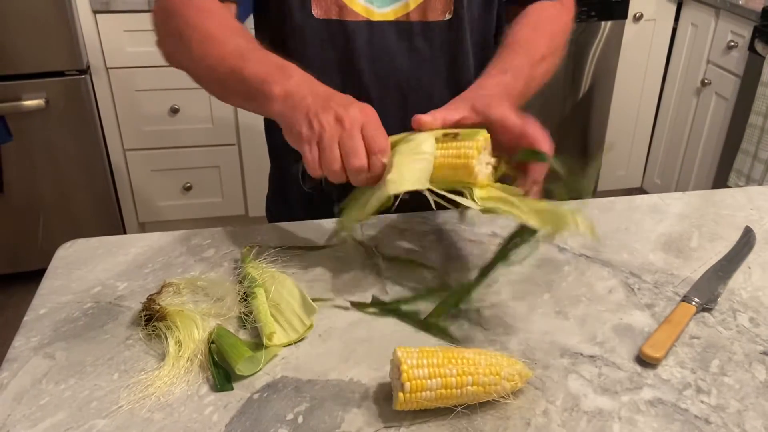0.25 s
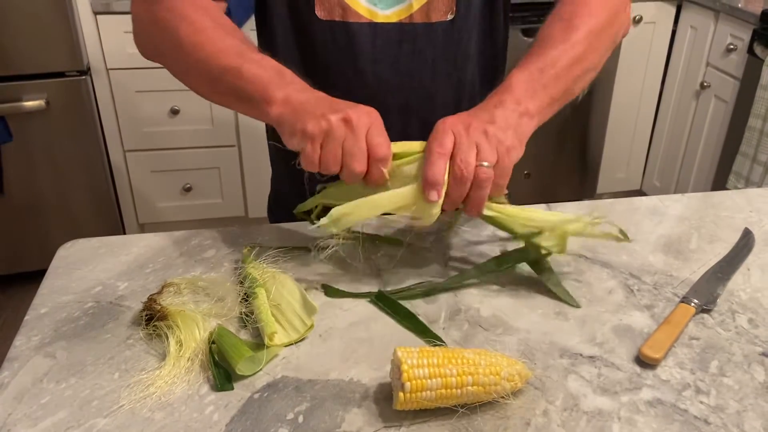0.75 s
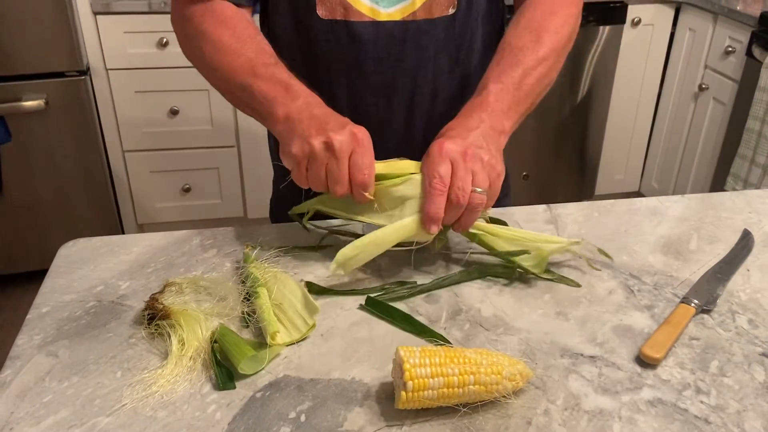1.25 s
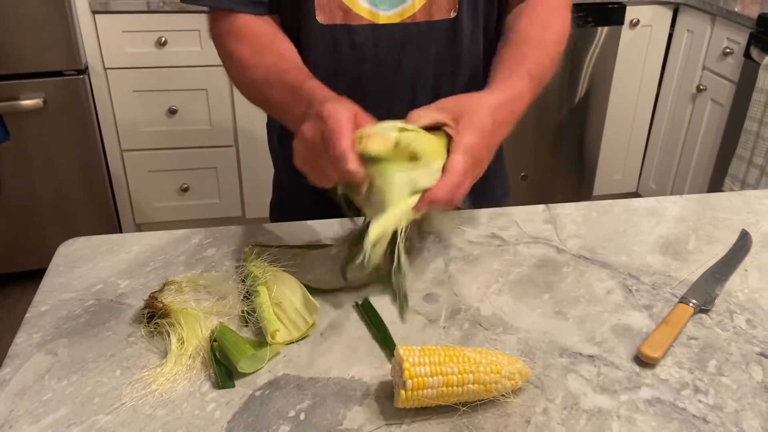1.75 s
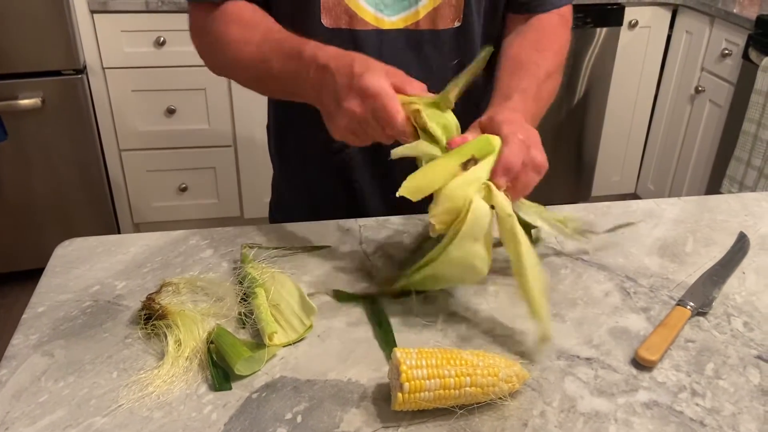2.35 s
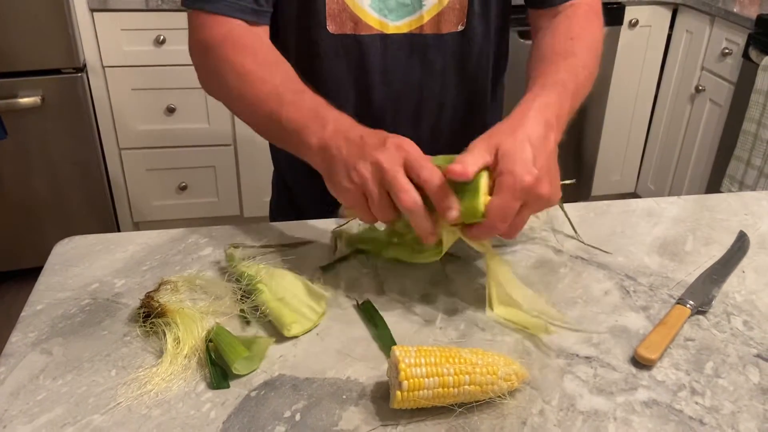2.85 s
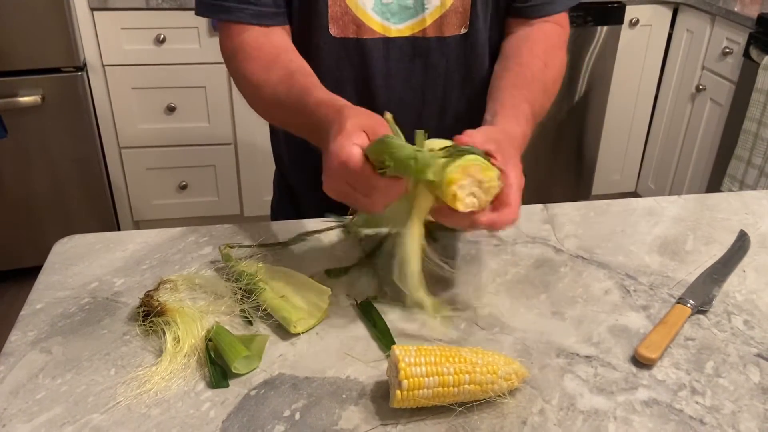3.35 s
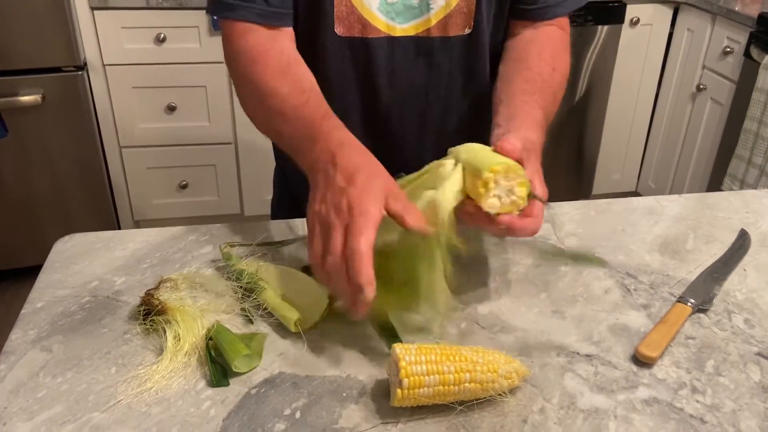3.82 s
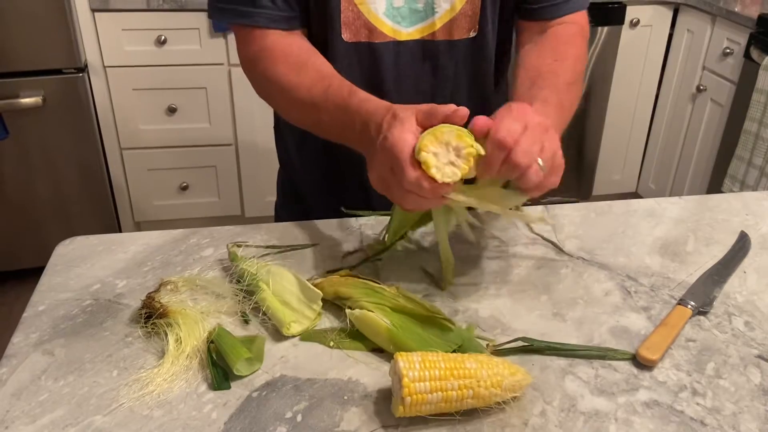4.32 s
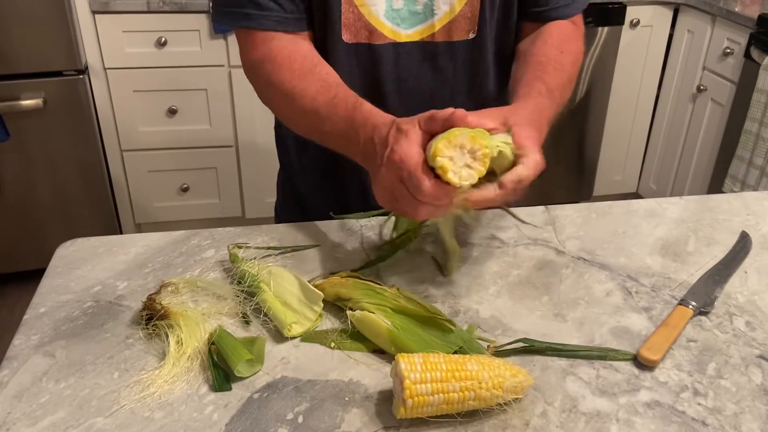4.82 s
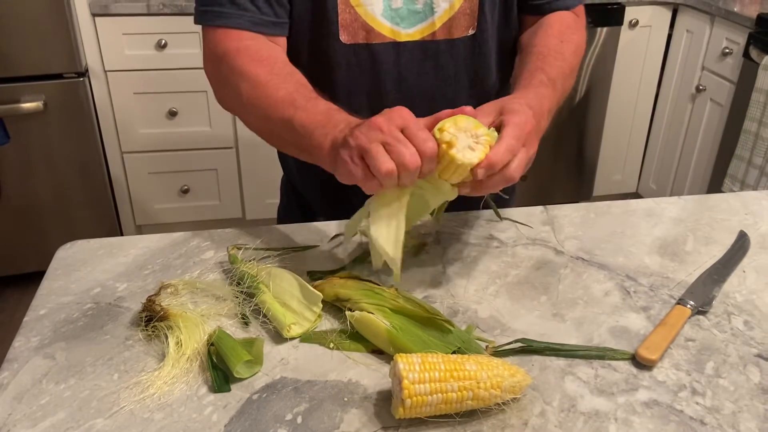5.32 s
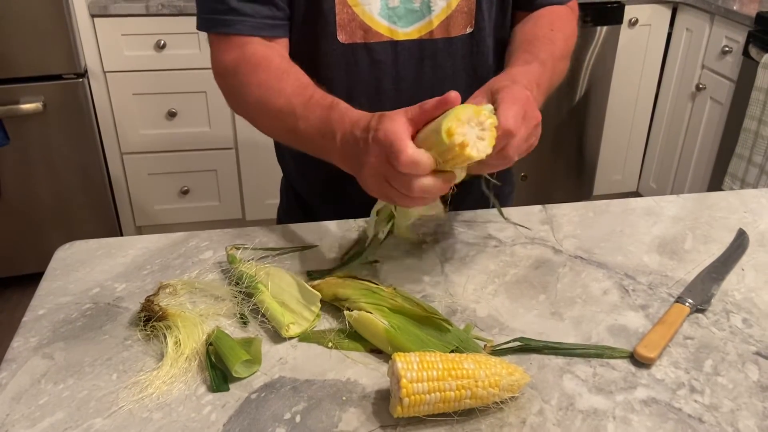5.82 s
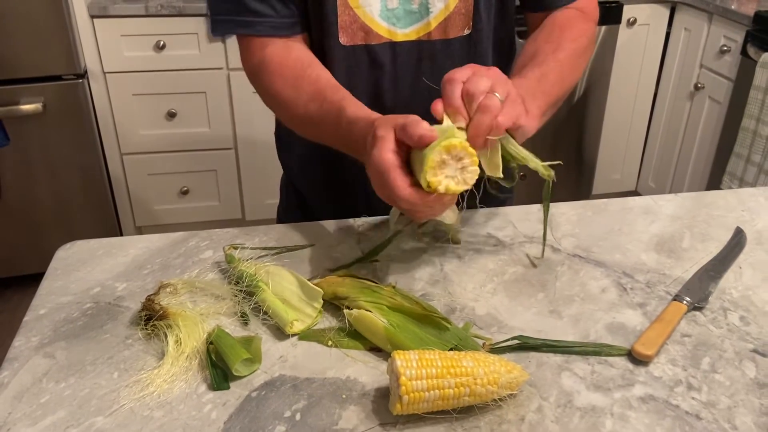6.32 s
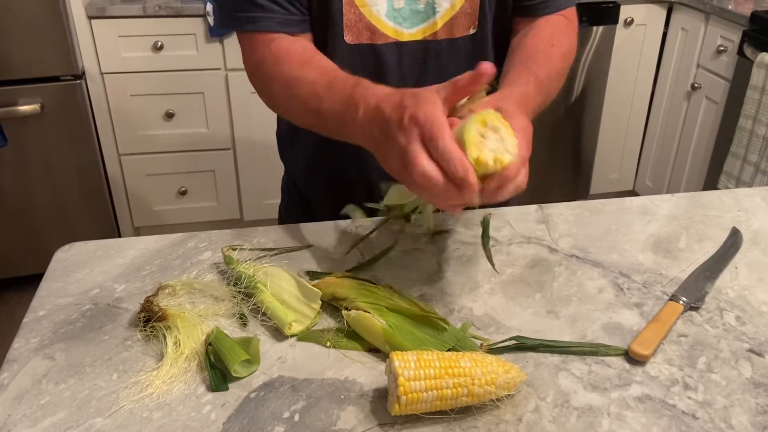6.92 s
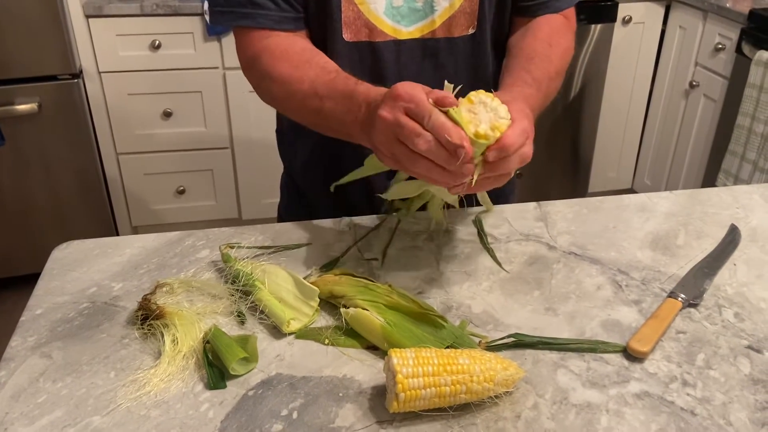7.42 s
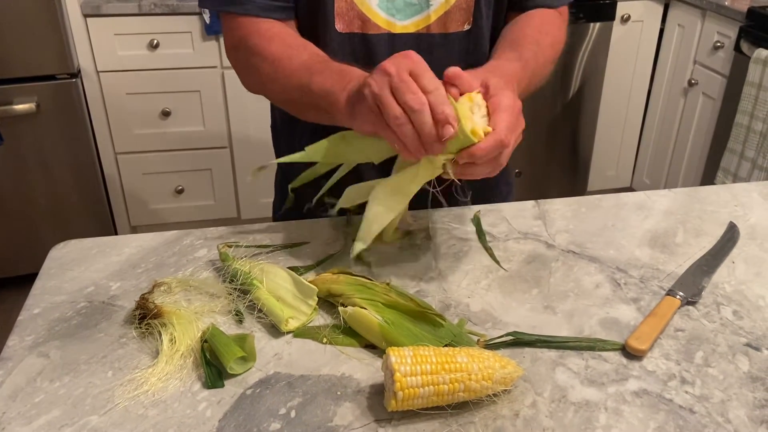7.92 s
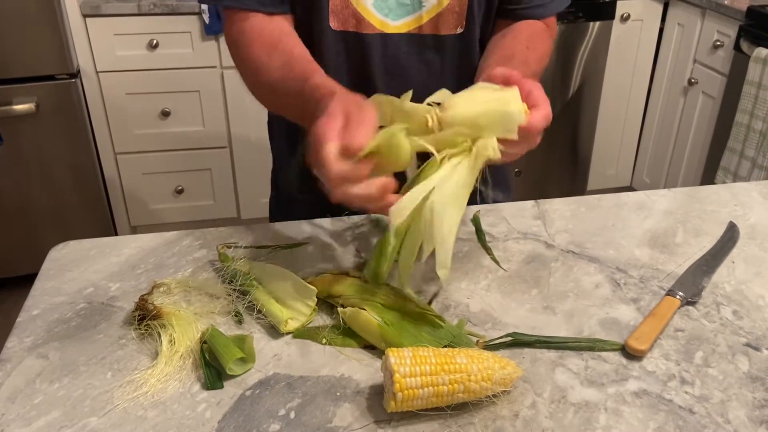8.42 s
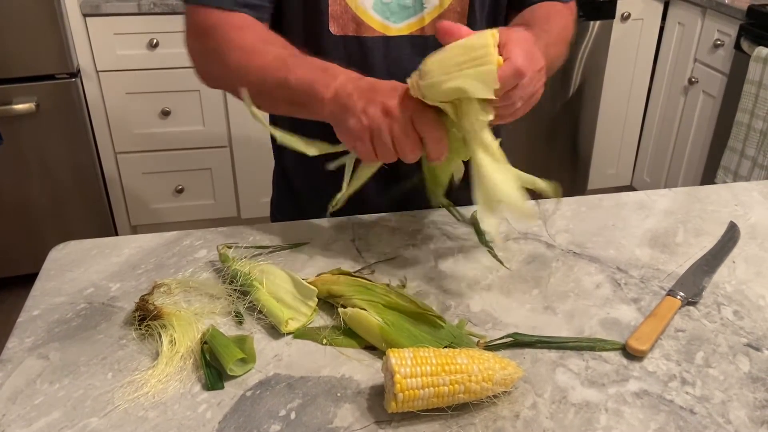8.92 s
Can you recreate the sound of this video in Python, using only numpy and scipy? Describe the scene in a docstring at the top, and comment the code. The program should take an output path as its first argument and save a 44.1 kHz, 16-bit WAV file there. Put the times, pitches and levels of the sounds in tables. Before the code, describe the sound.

Leafy rustling and sharp fibre snaps as damp husks are peeled from corn, over faint room air and a low appliance hum.

```python
"""Hands peel and tear fresh husks off a corn cob over a stone counter in a hard, echoing kitchen.
The leaves rustle as clumped creases crackle; breaking fibres snap as broad, raggedly spread clicks.
Wet leaves squeak as unsteady harmonics; cob and husk bundle thud as short damped modes.
Air noise and an appliance's wavering low tones lie behind; a phone's two microphone ports listen."""
import sys
import numpy as np
from scipy import signal
from scipy.fft import rfft, irfft, next_fast_len
from scipy.io import wavfile
from scipy.ndimage import uniform_filter1d

SR = 44100
rng = np.random.default_rng(int(sys.argv[2]) if len(sys.argv) > 2 else 0)


def output_pcm(signal):
    """Save a mono or channel-first signal as 16-bit PCM at the path in sys.argv[1].

    Samples are clipped to [-1, 1] before scaling.
    """
    pcm = np.clip(np.atleast_2d(signal).T, -1, 1) * 32767
    wavfile.write(sys.argv[1], SR, np.round(pcm).astype(np.int16))


N = 403956


def amp(db):
    """Decibels to gain."""
    return 10 ** (np.asarray(db) / 20)


def evened(x):
    """Scales to rms 1."""
    return x / np.sqrt(np.mean(x ** 2) + 1e-20)


def smooth(x, width):
    """Two moving averages of width samples, scaled to rms 1."""
    return evened(uniform_filter1d(uniform_filter1d(x, width), width))


def read(points, hz):
    """Reads a spectrum table on a log-frequency axis."""
    f, value = np.transpose(points)
    return np.interp(np.log(hz + 1), np.log(f + 1), value)


def add(mix, start_s, sound):
    """Mixes a sound in at a time."""
    part = mix[round(start_s * SR):][:len(sound)]
    part += sound[:len(part)]


def colour(x, gain):
    """Multiplies the spectrum by gain(hz)."""
    size = next_fast_len(x.shape[-1])
    spectrum = rfft(x, size) * gain(np.fft.rfftfreq(size, 1 / SR))
    return irfft(spectrum, size)[..., :x.shape[-1]]


# Likeness of diffuse sound at the two ports. Each row: frequency in Hz, correlation (0 to 1).
PORT_LIKENESS = [(60, 1), (200, 0.87), (450, 0.61), (1200, .05), (2500, 0.054), (4500, 0.13), (8000, 0.96),
                 (16000, 1)]


def diffuse(pair):
    """Two unrelated signals made as alike as diffuse sound is at the two ports."""
    def likeness(hz):
        """Shared part of the signal at hz."""
        return np.clip(read(PORT_LIKENESS, hz), -1, 1)

    shared = colour(pair[0], likeness)
    unshared = colour(pair[1], lambda hz: np.sqrt(1 - likeness(hz) ** 2))
    return np.array([pair[0], shared + unshared])


# Pulls and shifts of the leaves.
# Each row: peak time in s, relative effort in dB, build-up in s, crisp over dull part in relative dB.
PULLS = [(.03, -50, 0.13, -5), (.12, -50, 0.59, -3.5), (0.283, -51, 0.12, 6.5), (.464, -48.5, 0.017, -3.5),
         (1.088, -53, 0.31, 3.5), (1.172, -47.5, 0.11, -1.5), (1.413, -17, 0.0055, -13),
         (1.44, -16.5, 0.017, -9.5), (1.531, -34.5, 0.2, -25), (1.756, -40.5, 0.042, -11),
         (1.805, -42, 0.11, -16), (2.021, -35.5, 0.025, 6), (2.175, -50, 0.16, 5),
         (2.309, -27.5, 0.12, -1.5), (2.694, -46.5, 0.086, -2), (2.864, -40, 0.043, -11),
         (2.993, -48, 0.4, -1.5), (3.163, -41.5, 0.27, -3), (3.367, -49, 0.095, 5),
         (3.712, -43.5, .012, -16), (3.762, -57.5, 0.061, 13), (3.81, -53.5, 0.082, 11.5),
         (3.866, -46, 0.082, -10), (3.926, -46.5, 0.25, -8.5), (4.345, -40, 0.6, -2),
         (4.485, -45, 0.087, 2.5), (4.714, -56.5, 0.27, 9), (4.83, -49.5, 0.42, -2.5),
         (5.01, -46.5, 0.16, -3), (5.323, -51, 0.048, 2), (5.984, -49, 0.011, -2.5), (6.091, -48, .05, -6),
         (6.175, -42.5, 0.019, 1.5), (6.24, -43, 0.087, 4), (6.451, -35.5, 0.27, 3.5),
         (7.229, -57, 0.068, 8.5), (7.618, -63.5, 0.048, 7), (8.112, -31.5, 0.016, -8),
         (8.19, -35.5, 0.18, -3), (8.233, -18, 0.017, -27), (8.299, -26.5, 0.16, -2.5),
         (8.675, -39.5, 0.14, -0.5), (8.93, -47.5, 0.086, -0.5), (9.029, -45.5, 0.026, 6.5),
         (9.119, -31.5, 0.054, 7), (9.159, -29, 0.14, -7)]
# Steady rustle in the hands. Each row: time in s, relative effort in dB.
HOLDING = [(0, -66), (.75, -52), (1.3, -127), (2, -54.5), (2.55, -55.5), (3.6, -57.5), (5.4, -60.5),
           (5.6, -68.5), (5.75, -58), (6.2, -65), (6.72, -55.5), (6.8, -69), (6.9, -55.5), (7.4, -66),
           (7.75, -63.5), (8.05, -62.5), (9.1, -54.5)]
BUILD_DB = 34  # rise over the build-up
LET_GO_DB_PER_S, SETTLE_DB, SETTLE_DB_PER_S = 248, -16.5, 76  # quick release, then slow settling
HOLDING_CRISP_DB, FIDGET_RMS_DB = -4, 1


def effort():
    """Gains of the dull and crisp rustle: every pull builds up, lets go and settles; the grip fidgets."""
    t = np.arange(0, N, 32) / SR
    peak_s, db, build_s, crisp_db = np.transpose(PULLS)[:, :, None]
    since_s = t - peak_s
    build_db = BUILD_DB * since_s / abs(build_s)
    release_db = np.maximum(-LET_GO_DB_PER_S * since_s, SETTLE_DB - SETTLE_DB_PER_S * since_s)
    pulls = amp(db + np.where(since_s < 0, build_db, release_db))
    fidget = smooth(rng.standard_normal(len(t)), 60)
    held = amp(np.interp(t, *np.transpose(HOLDING)) + FIDGET_RMS_DB * fidget)
    dull = np.sqrt(held ** 2 + (pulls ** 2).sum(0))
    crisp = np.sqrt((held * amp(HOLDING_CRISP_DB)) ** 2 + ((pulls * amp(crisp_db)) ** 2).sum(0))
    return [np.interp(np.arange(N) / SR, t, gain) for gain in (dull, crisp)]


# Spectrum of the rustle. Each row: frequency in Hz, relative level in dB per Hz.
LEAF_SPECTRUM = [(200, -18), (500, -4.5), (1000, -9), (1900, -6), (4000, -5), (7000, -7.5), (10000, -8.5),
                 (13000, -18), (16000, -33.5)]
CREASES_PER_S, PATCHES, CRISP_ABOVE_HZ = 4000, 12, 3900


def rustle():
    """Countless tiny creases of unequal size give way in clumps, each leaf patch at its own pitch."""
    dull_gain, crisp_gain = effort()
    clumps = smooth(rng.standard_normal(N), 150)
    chance, size = rng.random(N), rng.exponential(1, N)
    patch = rng.integers(0, PATCHES, N)
    crease_db = 2.6 * np.minimum(size, 2.2) + 4.3 * np.minimum(clumps, 1.3)
    creases = (chance < CREASES_PER_S / SR) * amp(crease_db)

    # now one part of the leaf crackles, now another
    busy = uniform_filter1d(rng.standard_normal((N // 64 + 1, PATCHES)), size=24, axis=0)
    busy = evened(uniform_filter1d(busy, size=3, axis=1))
    creases = creases * amp(4.42 * busy[np.arange(N) // 64, patch])

    t, grains = np.arange(256) / SR, np.zeros(N)
    for k, hz in enumerate(np.geomspace(1000, 13000, num=PATCHES)):
        crackle = np.cos(2 * np.pi * hz * t) * np.exp(-t * hz / 1.1)
        grains += signal.oaconvolve(creases * (patch == k), crackle * np.sqrt(hz))[:N]
    grains = evened(grains) + 0.52 * rng.standard_normal(N)
    grains = colour(grains, lambda hz: amp(read(LEAF_SPECTRUM, hz)))

    crisp = colour(grains, lambda hz: 1 / (1 + (CRISP_ABOVE_HZ / (hz + 1)) ** 5.45))
    dull = grains - crisp
    return amp(-4.5) * (dull_gain * evened(dull) + amp(3.0) * crisp_gain * evened(crisp))


# Bounce off the counter, left then right port. Each row: delay in ms, level in dB.
BOUNCE = [(1.7, -17), (2.2, -16.5)]


def counter_bounce(hands):
    """One delayed, weaker copy of the hands per port."""
    return [amp(db) * np.pad(hands, (round(ms * SR / 1000), 0))[:N] for ms, db in BOUNCE]


# Decay of the room. Each row: frequency in Hz, t60 in s.
KITCHEN_T60 = [(200, 0.23), (800, 0.49), (2000, 0.57), (3200, 0.49), (4500, 0.52), (9700, 0.46)]
# Strength of the echo. Each row: frequency in Hz, gain in dB.
ECHO_GAIN = [(300, 4), (950, -3.5), (2000, 0), (4500, -3.5), (9000, -6), (15000, -11.5)]


def kitchen(x):
    """Sparse random reflections swell in after a short gap, each band dying at its own speed."""
    taps = np.zeros((2, SR))
    at = np.arange(0, SR - 20, 16) + rng.integers(0, 16, (2, (SR - 5) // 16))
    np.put_along_axis(taps, at, rng.choice([-1., 1.], at.shape), 1)
    hz, t, bands = signal.stft(taps, SR, nperseg=256)
    decay = amp(-60 * t / read(KITCHEN_T60, hz)[:, None])
    tail = signal.istft(bands * decay, SR, nperseg=256)[1]

    t = np.arange(tail.shape[1]) / SR
    early = 1 + 0.72 * np.exp(-((t - .012) / 0.0036) ** 2)  # cupboards and ceiling
    onset = np.clip((t - .002) / 0.0011, 0, 1)
    tail = tail * early * onset
    wet = signal.fftconvolve(x[None], tail / np.linalg.norm(tail[0]), axes=1)[:, :N]
    return diffuse(colour(wet, lambda hz: amp(read(ECHO_GAIN, hz))))


# Spectrum of the air noise. Each row: frequency in Hz, relative level in dB per Hz.
AIR_SPECTRUM = [(30, -5.5), (55, -5), (150, -6), (300, -5), (470, -12), (1400, -28), (3000, -36),
                (6500, -28), (9000, -33.5), (12500, -41), (15500, -98)]
# Appliance tones. Each row: frequency in Hz, rms wavering in Hz, relative level in dB.
HUM_TONES = [(146, 2.47, -55), (198, 8.57, -54.5), (289.3, 6.67, -63.5)]
AIR_RMS_DB, HUM_GAIN_DB, SWELL_RMS_DB = -49.5, 1.5, 2.0


def background():
    """Filtered noise for room air; sines wavering in pitch and level for the appliance."""
    air = evened(colour(rng.standard_normal((2, N)), lambda hz: amp(read(AIR_SPECTRUM, hz))))
    hum = np.zeros(N)
    for hz, waver_hz, db in HUM_TONES:
        drift, swell = (smooth(v, 1500) for v in rng.standard_normal((2, N)))
        turns = np.cumsum(hz + waver_hz * drift) / SR
        hum += amp(db + HUM_GAIN_DB + SWELL_RMS_DB * swell) * np.sin(2 * np.pi * turns)
    return diffuse(amp(AIR_RMS_DB) * air) + hum


# Breaking fibres. Each row: start in s, peak level in dB, pitch of the crack in Hz.
SNAPS = [(0.5743, -27.5, 3230), (0.947, -34, 3400), (1.014, -30, 2550), (1.072, -36, 1800),
         (1.087, -33, 1970), (1.1575, -20.5, 4230), (1.3141, -30.5, 2010), (1.3291, -26.5, 2600),
         (1.4142, 5, 1900), (1.429, -8, 4300), (1.76, -23.5, 1450), (1.772, -23.5, 1570),
         (1.8044, -30.5, 1390), (1.813, -27, 1370), (1.821, -32, 1400), (2.0026, -19.5, 1800),
         (2.0008, -24, 3360), (2.1293, -22, 5880), (2.155, -16.5, 4720), (2.2591, -18.5, 3830),
         (2.2856, -14.5, 1060), (2.316, -23, 4070), (2.324, -26, 3750), (2.5556, -29.5, 5340),
         (2.581, -29.5, 2080), (2.6894, -33, 4280), (3.15, -24, 7500), (3.161, -20.5, 8500),
         (3.168, -16, 6800), (3.177, -27, 2300), (3.27, -7, 4760), (3.3521, -9.5, 2490),
         (3.4026, -20.5, 4570), (3.906, -28, 1050), (4.0627, -32, 5410), (4.2625, -25, 3820),
         (4.3474, -8.5, 3700), (4.354, -21.5, 3080), (4.452, -17, 6740), (4.505, -36, 3580),
         (4.58, -33, 3330), (4.616, -31, 6100), (4.6442, -20, 2130), (4.6455, -20.5, 6300),
         (5.198, -36.5, 4100), (5.61, -37.5, 5970), (5.798, -33, 3600), (5.862, -33.5, 1260),
         (6.08, -33.5, 1680), (6.167, -27, 6300), (6.1785, -22.5, 5000), (6.294, -18.5, 6500),
         (6.308, -23, 3600), (6.4059, -22, 3660), (6.4403, -26, 2150), (6.464, -23, 4730),
         (7.214, -35, 1570), (7.5993, -30, 7500), (7.624, -35, 5500), (8.058, -36, 1400),
         (8.104, -11.5, 3130), (8.1384, -14, 3600), (8.15, -23, 4500), (8.164, -13, 3500),
         (8.185, -17, 4300), (8.229, -13, 3900), (8.235, -18, 3070), (8.2448, -24, 4150),
         (8.258, -10.5, 3500), (8.2772, -14, 2000), (8.2907, -6.5, 2980), (8.2949, -6, 2120),
         (8.3045, -8, 3580), (8.3118, -10, 2420), (8.321, -18, 2220), (8.642, -26.5, 4080),
         (8.9167, -29, 1790), (8.946, -25.5, 5200), (9.015, -22, 2600), (9.049, -27, 4900),
         (9.0826, -18, 5120), (9.095, -15.5, 5900), (9.104, -19, 7100), (9.1279, -10, 6100),
         (9.1398, -19, 1490)]
# Base spectrum of a break. Each row: frequency in Hz, relative level in dB per Hz.
CRACK_SPECTRUM = [(80, -33), (500, -5), (1000, -4), (2200, -5), (6000, -5), (10000, -4), (13000, -14),
                  (16000, -51)]


def snaps():
    """Broad clicks lifted around a pitch, frequencies arriving raggedly, the low ones last.
    Row 0 goes to the phone, with lumps of its own; row 1 to the room: all directions, hence even."""
    out, f = np.zeros((2, N)), np.fft.rfftfreq(1024, 1 / SR) + 1
    for start_s, db, hz in SNAPS:
        ragged, lumps = (smooth(v, 12) for v in rng.standard_normal((2, len(f))))
        late_s = .0004 + .0007 * abs(ragged) + np.minimum(1.262 / f, .006)
        # quiet, thin fibres are more sharply pitched and have less bass
        lift_db = (4.0 - 0.16 * db) * np.exp(-(np.log2(f / hz) / 0.45) ** 2)
        lift_db -= 2.4 * np.maximum(np.log2(hz / (1.6 * f)), 0) * np.clip(-db / 25, 0, 1)
        lift_db -= 5.7 * np.maximum(np.log2(f / (1.9 * hz)), 0)  # low cracks have less treble
        phase = 2 * np.pi * np.cumsum(late_s) * SR / 1024  # integrates the arrival time
        even = amp(read(CRACK_SPECTRUM, f) + lift_db) * np.exp(-1j * phase)
        near, all_round = irfft(even * amp(4.4 * lumps)), irfft(even)
        add(out[0], start_s, amp(db) * near[:512] / abs(near).max())
        add(out[1], start_s, amp(db) * all_round[:512] / abs(all_round).max())
    return out


# Dull blows of cob and husk bundle. Each row: start in s, peak level in dB, pitch in Hz, t60 in s.
KNOCKS = [(1.4144, -6, 467, 0.0062), (2.848, -25.5, 560, 0.035), (2.856, -30, 704, 0.054),
          (3.579, -35.5, 680, 0.017), (3.87, -32.5, 110, 0.069), (3.905, -36, 132.5, 0.2),
          (6.394, -33.5, 639, 0.038), (7.332, -44, 83, 0.27), (8.144, -28.5, 260, 0.042),
          (8.164, -23, 610, 0.011), (8.186, -24, 557, 0.01)]
MODES = [(1, 0.93), (1.35, 0.8), (2.4, 0.066), (3.9, 0.18)]  # Each row: ratio to the pitch, share.


def knocks():
    """A soft, ragged blow rings a few damped modes."""
    out, t = np.zeros(N), np.arange(SR // 4) / SR
    for start_s, db, hz, t60_s in KNOCKS:
        ring = sum(share * np.sin(2 * np.pi * ratio * hz * t) for ratio, share in MODES)
        ring = amp(-60 * t / t60_s) * ring
        blow = (1 + .5 * rng.standard_normal(1024)) * t[:1024] * np.exp(-t[:1024] * hz / 0.22)
        thud = np.diff(signal.fftconvolve(ring, blow))
        thud = colour(thud, lambda f: f / (f + hz))  # small bodies radiate little bass
        add(out, start_s, amp(db) * thud / abs(thud).max())
    return out


# Wet leaves stick and slip.
# Each row: start in s, fundamental's level in dB, length in s, start pitch in Hz, end pitch in Hz.
SQUEAKS = [(1.42, -13, 0.013, 2260, 1920), (1.442, -26, 0.024, 2194, 1610),
           (2.002, -22.5, 0.015, 3440, 3160), (2.019, -26, 0.025, 1840, 1304),
           (2.032, -29, 0.032, 2008, 1940), (2.163, -33.5, 0.025, 1052, 1052),
           (2.277, -30, .012, 1056, 960), (4.295, -37.5, .036, 2184, 1730), (8.932, -40, 0.023, 1886, 2060),
           (9.028, -35, .017, 1696, 2210), (9.122, -39.5, 0.015, 1460, 1430)]
OVERTONE_DB_PER_KHZ = -3.5  # step between overtones per kHz of end pitch: higher squeaks are purer


def squeaks():
    """Stick-slip gives a harmonic tone, unsteady in pitch and level."""
    out = np.zeros(N)
    for start_s, db, length_s, from_hz, to_hz in SQUEAKS:
        count = round(length_s * SR)
        noise = rng.standard_normal((2, 4096))
        wobble, flutter = (evened(uniform_filter1d(v[:count], 60)) for v in noise)
        turns = np.cumsum(np.linspace(from_hz, to_hz, count) * (1 + 0.084 * wobble)) / SR
        step_db = OVERTONE_DB_PER_KHZ * to_hz / 1000
        tone = sum(amp(k * step_db) * np.sin(2 * np.pi * (k + 1) * turns) for k in range(4))
        add(out, start_s, amp(db + 2.1 * flutter) * tone * signal.windows.tukey(count, .6))
    return out


def scene():
    """The hands in front of the phone, the bounce off the counter, the echo and the room tone."""
    leaves = rustle() + knocks()
    breaks, breaks_all_round = snaps()
    slips = squeaks()
    hands = leaves + breaks + slips
    to_room = leaves + amp(-1.0) * breaks_all_round + amp(-2.5) * slips
    return hands + counter_bounce(hands) + kitchen(to_room) + background()


# Phase between the ports. Each row: frequency in Hz, lead of the left port in radians.
LEFT_LEAD = [(0, 0), (1210, 0.5), (1460, 0.7), (3010, 0.6), (3790, 0.2), (7410, -0.0), (8440, -2.9),
             (9560, -3.4), (10400, -5.9), (11600, -6.3), (12500, -9.2), (13800, -9.5), (14600, -12.5),
             (16200, -12.7)]
# Level between the ports. Each row: frequency in Hz, left over right in dB.
LEFT_LOUDER = [(60, -0.1), (2500, 1.5), (15000, 0.5)]
BASS_CUT_HZ, EDGE_HZ, CLIP_LEVEL = 45, 16500, .8


def record(dry):
    """Ports cut deep bass and differ in phase and level by frequency; soft clipping; band limit."""
    dry = signal.lfilter(*signal.butter(3, BASS_CUT_HZ, "highpass", fs=SR), dry)
    left = colour(dry[0], lambda hz: amp(read(LEFT_LOUDER, hz) / 2))
    right = colour(dry[1], lambda hz: amp(-read(LEFT_LOUDER, hz) / 2) * np.exp(-1j * read(LEFT_LEAD, hz)))
    squeezed = CLIP_LEVEL * np.tanh(np.array([left, right]) / CLIP_LEVEL)
    lowpass = signal.firwin(511, EDGE_HZ, window=("kaiser", 9), fs=SR)
    return signal.oaconvolve(squeezed, lowpass[None], "same")


dry = scene()
out = record(dry)
output_pcm(out)
```